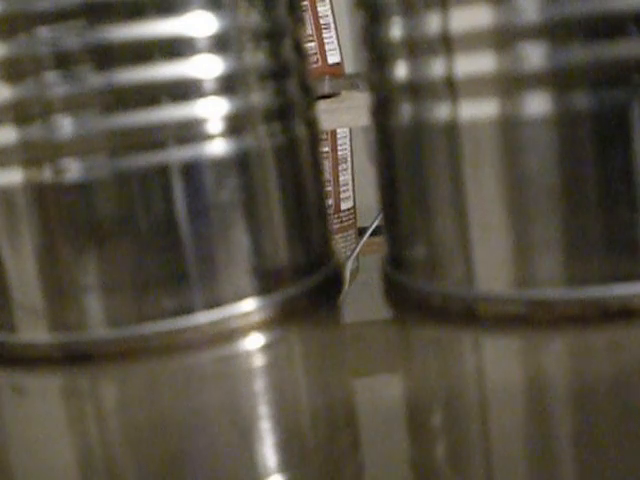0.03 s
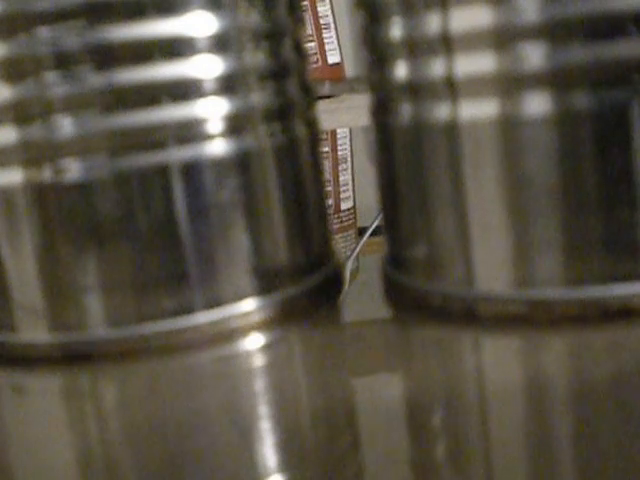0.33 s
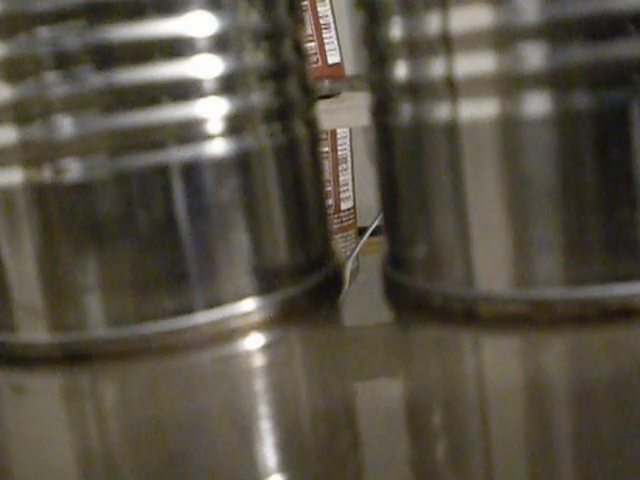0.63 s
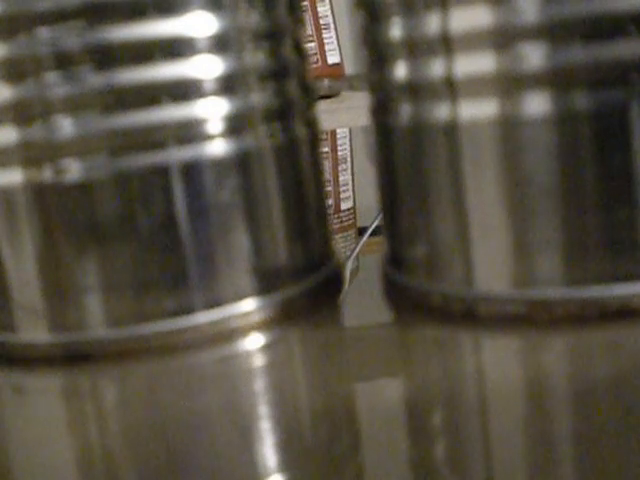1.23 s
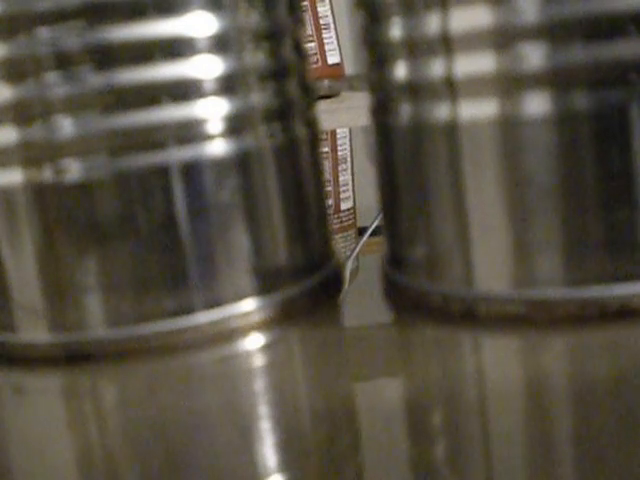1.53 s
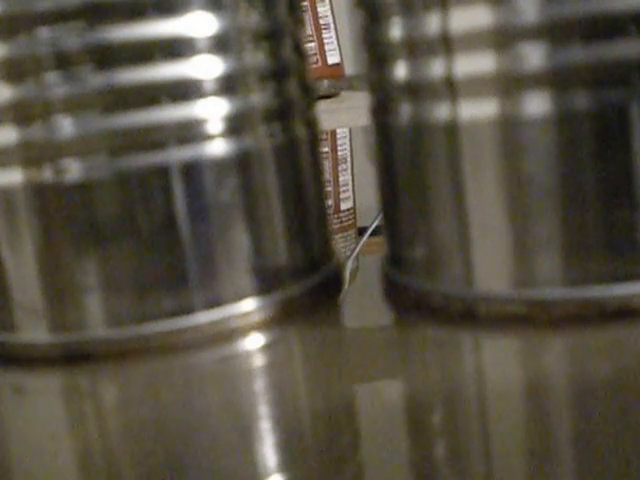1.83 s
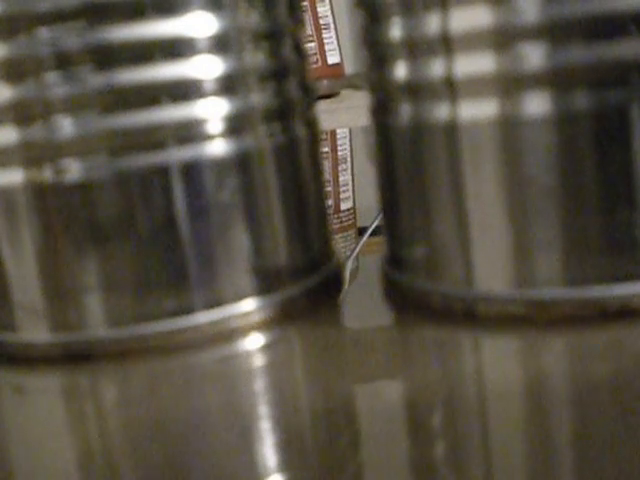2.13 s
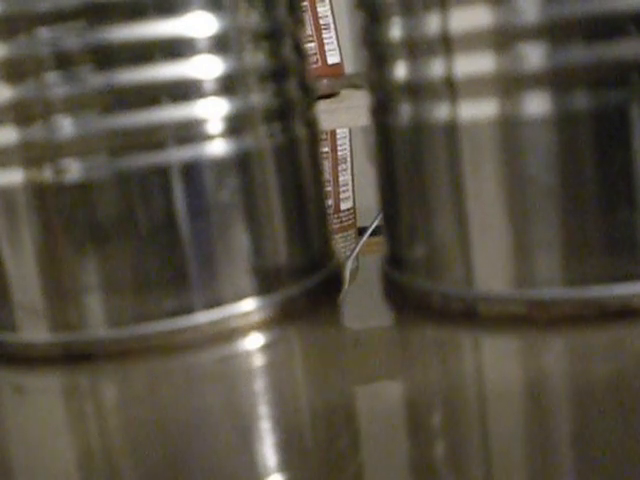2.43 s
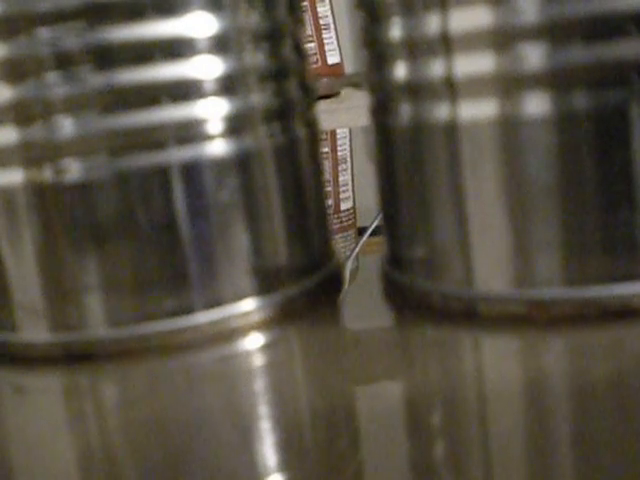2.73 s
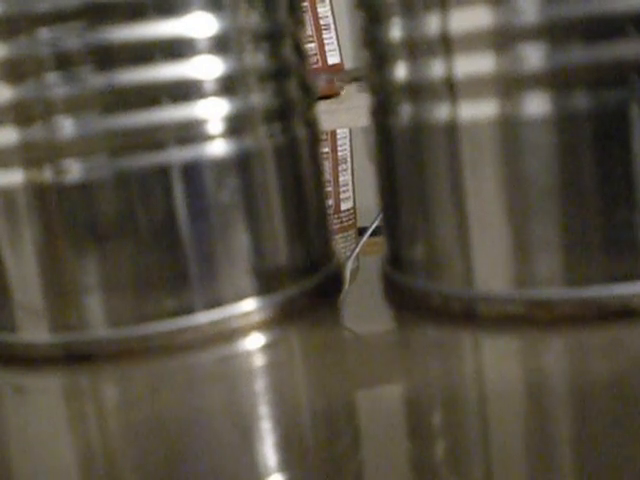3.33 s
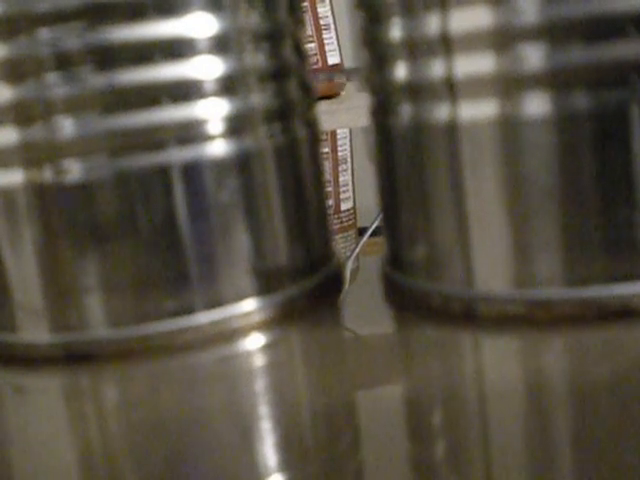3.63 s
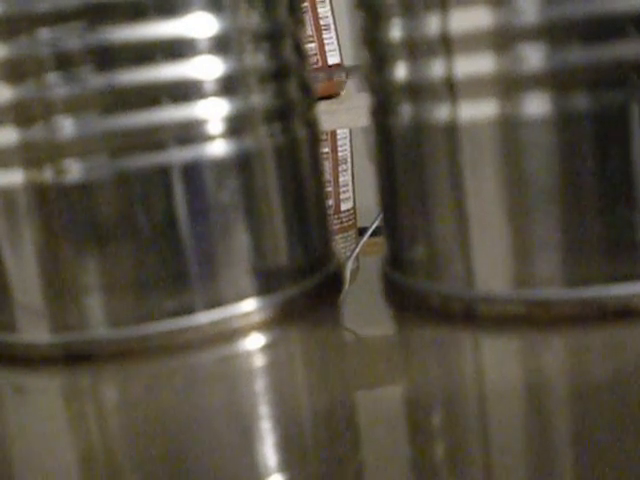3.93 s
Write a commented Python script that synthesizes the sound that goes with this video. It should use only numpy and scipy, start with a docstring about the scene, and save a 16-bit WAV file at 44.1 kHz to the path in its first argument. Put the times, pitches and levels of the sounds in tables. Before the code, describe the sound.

Electrical discharges crackle in quick runs of loud pops and snaps, over steady ticking and hum.

```python
"""One microphone at a bench in a room: over a steady hum, an ignition coil ticks about 13 times a second.
In the first 1.5 s a few firings jump the gap between two tin cans, with a snap that rings cans and room.
Others leak into the microphone's amplifier as overloaded pops, and the strong ones choke it for a moment:
a lone pop near 1 s, then a loud run from 1.9 to 2.8 s with one snap in it.
A run of snaps follows until 3.5 s, and the pops return to the end."""
import sys
import numpy as np
from scipy import signal
from scipy.fft import rfft, irfft
from scipy.io import wavfile
from scipy.ndimage import uniform_filter1d

SR = 44100
rng = np.random.default_rng(int(sys.argv[2]) if len(sys.argv) > 2 else 0)


def digitize_waveform(pressure):
    """Quantize a signal to 16-bit integers and store it at the path in sys.argv[1].

    Rows of a 2-D input are taken as channels; values are limited to [-1, 1].
    """
    field = np.atleast_2d(pressure).T
    bounded = np.clip(field, -1, 1)
    quanta = np.round(bounded * 32767).astype(np.int16)
    wavfile.write(sys.argv[1], SR, quanta)


N = 176400

# hum in the background (frequency [Hz], level before swell and waver [dB])
HUM_TONES = [(352.4, -36.5), (202.4, -56), (412.6, -51.5), (743, -59), (774.5, -52.5)]
# slow swell of the hum (time [s], gain [dB])
HUM_SWELL = [(0, -0.5), (.5, -1), (1.5, 1.5), (2.5, 1), (4, -0.5)]
# rush of air around the hum (frequency [Hz], relative level [dB])
AIR_SPECTRUM = [(30, -33), (100, -28), (150, -15), (205, -4.5), (260, -10.5), (320, -5.5), (420, -4),
                (500, 1.5), (620, -8.5), (770, -6.5), (1000, -11), (1300, -11), (1700, -21.5), (2300, -19),
                (3300, -25.5), (4500, -33)]
# hiss of the microphone's amplifier (frequency [Hz], relative level [dB])
HISS_SPECTRUM = [(50, -5), (200, -8), (1000, -2), (3200, -4.5), (4200, -7), (5000, -24.5)]
# reverberation of the room around the bench (frequency [Hz], relative level [dB])
ROOM_SPECTRUM = [(80, -31), (250, -10.5), (800, -1), (1500, 0.5), (1800, -2.5), (2200, 3.5), (2900, -0.5),
                 (3430, -1), (3900, -6.5), (4600, -10)]
# rasp of a tick at the coil (frequency [Hz], relative level [dB])
TICK_SPECTRUM = [(80, -26.5), (500, -13), (1300, -5), (2500, -1), (3500, -0.5), (4600, -7)]
# ring of the coil (frequency [Hz], level against the rasp [dB], decay [s])
COIL_RING = [(1826, -2, .005), (2166, 3.5, 0.0056), (2543, 3.5, 0.0055), (2990, 4.5, 0.005),
             (3120, -6.5, 0.0078)]
# crack of a spark between the cans (frequency [Hz], relative level [dB])
SNAP_SPECTRUM = [(80, -31), (250, -14.5), (700, 3.5), (1400, -0.5), (1800, -3), (2200, 5), (2900, 0),
                 (3430, 0), (3900, -3), (4600, -7.5)]
# ring of the cans (frequency [Hz], level against the crack [dB], decay [s])
CAN_RING = [(1990, -6.5, 0.003), (2227, -6.5, 0.0043), (3453, -3.5, 0.0027), (4580, -3.5, 0.0012)]
# sparks across the gap (time [s], relative level [dB], brightness [dB/octave])
GAP_SPARKS = [(.3016, -22, 5), (.8996, -38, 5.5), (1.2725, -41.5, 10), (1.349, -34.5, 5),
              (2.3905, -19.5, -1), (2.8388, -20, -1), (2.9135, -20.5, 0.5), (2.9882, -23, 1.5),
              (3.063, -21.5, 0), (3.137, -33.5, 2), (3.2115, -37.5, 5), (3.2865, -22.5, -1),
              (3.361, -22, -1), (3.4354, -21, -0.5), (3.5097, -22, 0.5)]
# discharges picked up by the microphone lead
# (time [s], overdrive [dB], restrike spacing [ms], first restrike overdrive [dB], restrikes [count])
DISCHARGES = [(.9759, 2.5, 0, 0, 0), (1.8707, 6, 0, 0, 0), (1.9415, -10.5, 0, 0, 0),
              (2.0155, 15, 2.26, 19, 3), (2.0908, 21.5, 2.5, 13, 1), (2.1653, 27.5, 2.5, 17, 1),
              (2.2401, 16.5, 2.5, 12.5, 1), (2.3147, 24.5, 2.5, 17, 1), (2.464, 27, 2.5, 23, 1),
              (2.539, 22, 1.53, 6.5, 2), (2.614, 12, 1.32, 13.5, 2), (2.6888, 21, 5, 2, 1),
              (2.7635, 26.5, 1.8, 3.5, 2), (3.5829, 33, 2.5, 18, 1), (3.6575, 18.5, 2, 4.5, 1),
              (3.7322, 7, 2.5, -3.5, 1), (3.8064, 26.5, 2, 14.5, 2), (3.8814, -11.5, 0, 5, 0),
              (3.9557, -10, 2.5, 9.5, 1)]


def undb(db):
    """Decibels to gain."""
    return 10 ** (np.asarray(db) / 20)


def noise(points, size=N):
    """Noise of rms 1 with a spectrum of (frequency [Hz], relative level [dB]) points."""
    hz, db = np.array(points, float).T
    bins_hz = np.maximum(np.arange(size // 2 + 1) * SR / size, 1)
    magnitude = undb(np.interp(np.log(bins_hz), np.log(hz), db))
    wave = irfft(magnitude * np.exp(2j * np.pi * rng.random(len(bins_hz))), size)
    return wave / wave.std()


def drift(rate_hz):
    """Slow random wander with a spread of 1."""
    step = int(SR / rate_hz)
    wander = uniform_filter1d(np.repeat(rng.standard_normal(N // step + 1), step), step)[:N]
    return wander / wander.std()


def add(out, start_s, sound):
    """Mix a sound in at a time."""
    i = max(int(start_s * SR), 0)
    out[i:i + len(sound)] += sound[:max(N - i, 0)]


def tilted(sound, db_per_octave):
    """Brighten or dull a sound by tilting its spectrum about 2 kHz."""
    octaves = np.log2(np.clip(np.fft.rfftfreq(len(sound), 1 / SR), 500, 5000) / 2000)
    return irfft(rfft(sound) * undb(db_per_octave * octaves), len(sound))


def hum(waver_db=1.17, waver_hz=.38):
    """Behind everything, a slightly wavering motor-like hum in a rush of air."""
    tones = np.zeros(N)
    for hz, db in HUM_TONES:
        amplitude = np.sqrt(2) * undb(db + waver_db * drift(9.9))
        phase = 2 * np.pi * np.cumsum(hz + waver_hz * drift(5)) / SR
        tones += amplitude * np.sin(phase)
    swell = undb(np.interp(np.arange(N) / SR, *np.array(HUM_SWELL).T))
    air = noise(AIR_SPECTRUM) * undb(-40 + .82 * drift(11))
    return tones * swell + air


def bench_cracks(events, spectrum, modes, decay_s, room_db, echo_gain=0):
    """Cracks with ringing modes and a room tail; all come from one spot, so they repeat nearly alike."""
    room_t60_s, room_onset_s, echo_s = .24, .0057, .0105
    fresh_share, ring_scatter_db = .22, 2.5
    t = np.arange(SR // 3) / SR
    rings = np.array([undb(db) * np.exp(-t / ring_s) * np.sin(2 * np.pi * hz * t)
                      for hz, db, ring_s in modes])
    tail = undb(room_db - 60 * t / room_t60_s) * np.minimum(t / room_onset_s, 1) ** 2
    end_fade = np.minimum(1, 10 * (1 - t / t[-1]))

    def crack():
        return np.exp(-t / decay_s) * noise(spectrum, len(t)) + tail * noise(ROOM_SPECTRUM, len(t))

    out, shared = np.zeros(N), crack()
    for start_s, db, brightness in events:
        ring = undb(ring_scatter_db * rng.standard_normal(len(modes))) @ rings
        sound = ring + np.sqrt(1 - fresh_share) * shared + np.sqrt(fresh_share) * crack()
        sound = undb(db) * tilted(sound, brightness) * end_fade
        add(out, start_s, sound)
        add(out, start_s + echo_s, echo_gain * sound)  # first reflection to reach the microphone
    return out


def coil_ticks(period_s=.0746, scatter_db=.53):
    """The coil on the bench ticks and rings at every firing."""
    firings = np.arange(.003, N / SR, period_s)
    ticks = [(start_s, -39.5 + scatter_db * rng.standard_normal(), 0) for start_s in firings]
    return bench_cracks(ticks, TICK_SPECTRUM, COIL_RING, decay_s=.0046, room_db=-17.5)


def sparks():
    """Sparks jump the gap, ringing the cans and the room."""
    return undb(2.8) * bench_cracks(GAP_SPARKS, SNAP_SPECTRUM, CAN_RING,
                                    decay_s=.0031, room_db=-11, echo_gain=undb(-15))


def lead_spikes(decay_ms=.35, backswing_ms=11, restrike_fade_db=9):
    """Voltage induced in the microphone lead: a strike, then fading restrikes; 1 is the amplifier's limit."""
    ms = np.arange(SR // 8) / SR * 1000
    spike = np.exp(-ms / decay_ms) - undb(-29.5) * np.exp(-ms / backswing_ms)
    out = np.zeros(N)
    for start_s, db, gap_ms, restrike_db, count in DISCHARGES:
        add(out, start_s, undb(db) * spike)
        for k in range(count):
            add(out, start_s + (k + 1) * gap_ms / 1000, undb(restrike_db - k * restrike_fade_db) * spike)
    return out


def choke(spikes, depth_db=12, recovery_s=.021):
    """Gain of the microphone: overload builds up a charge that turns it down until it has leaked away."""
    excess = np.maximum(spikes - 1, 0) * 1000 / SR
    charge = signal.lfilter([1], [1, -np.exp(-1 / (recovery_s * SR))], excess)
    return undb(-depth_db * np.tanh(1.83 * charge))


def pops(spikes, slew_hz=7500, coupling_hz=294.6, coupling_q=.98, bass_leak=.39):
    """The microphone's amplifier flattens each spike, rounds its edge and drains its bass."""
    flat = np.clip(spikes, -.31, 1)
    rounded = signal.lfilter(*signal.butter(1, slew_hz, fs=SR), flat)
    w = 2 * np.pi * coupling_hz
    coupling = signal.bilinear([1, bass_leak * w, 0], [1, w / coupling_q, w * w], SR)
    return undb(-.95) * signal.lfilter(*coupling, rounded)


def scene():
    """Hum, ticks and snaps cross the air to the microphone; pops and hiss arise in its amplifier."""
    spikes = lead_spikes()
    airborne = hum() + coil_ticks() + sparks()
    hiss = undb(-54.5) * noise(HISS_SPECTRUM)
    return (hiss + airborne * choke(spikes) + pops(spikes))[None]


def record(dry, band_hz=4384, soften_hz=7900, top_hz=16500):
    """A narrow-band mono camera recorder; the tallest pops clip, and the output softens their edge."""
    lowpass = signal.firwin(121, band_hz, fs=SR, window=("kaiser", 7))
    narrow = signal.fftconvolve(dry, lowpass[None], "same", axes=1)
    clipped = np.clip(narrow, -.99, .99)
    softened = signal.lfilter(*signal.butter(1, soften_hz, fs=SR), clipped)
    return signal.sosfilt(signal.ellip(8, .2, 70, top_hz, fs=SR, output="sos"), softened)


dry = scene()
out = record(dry)
digitize_waveform(out)
```